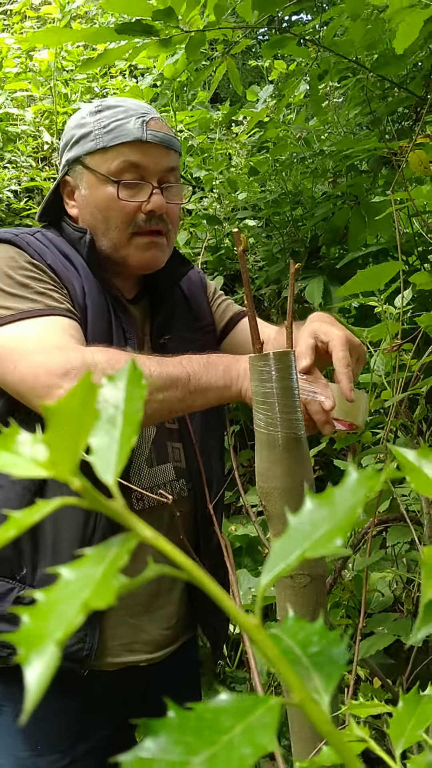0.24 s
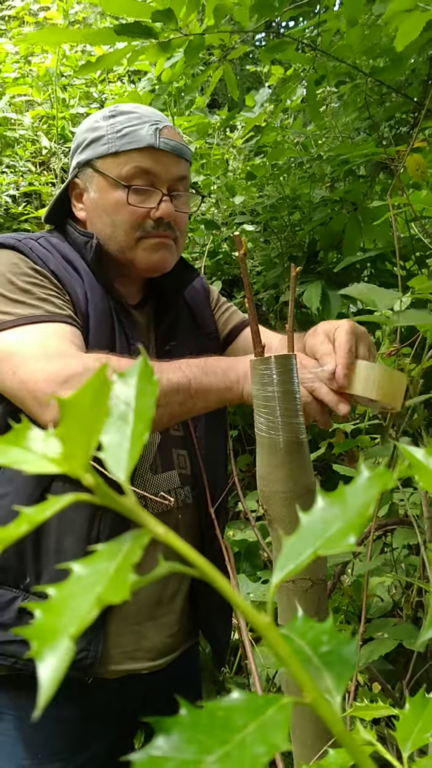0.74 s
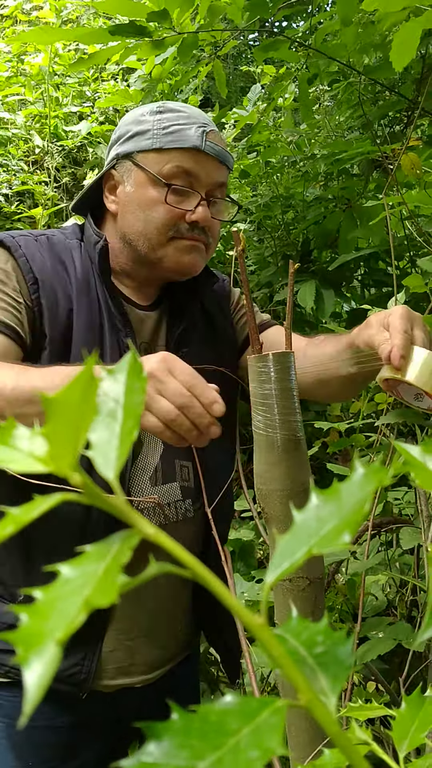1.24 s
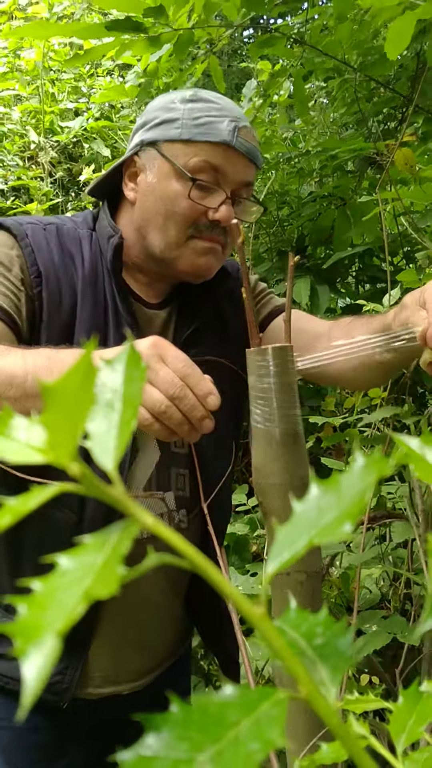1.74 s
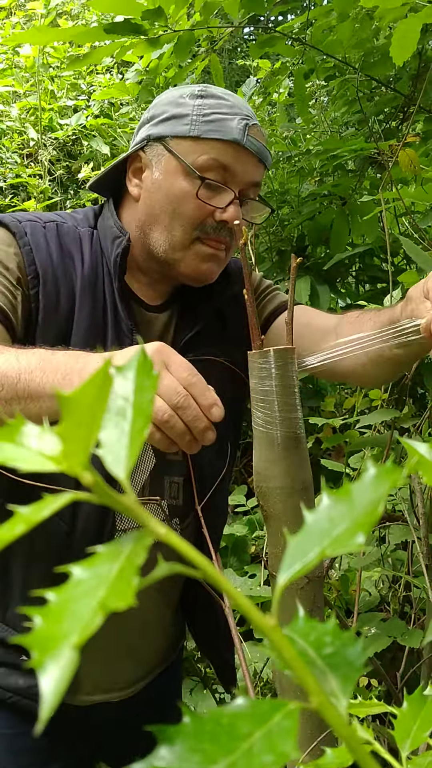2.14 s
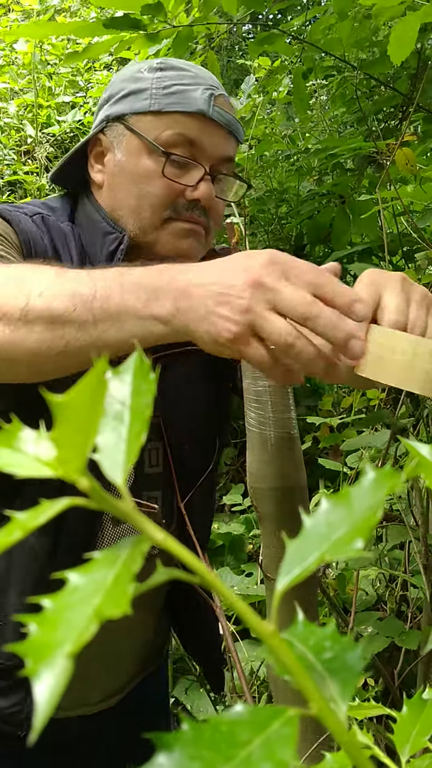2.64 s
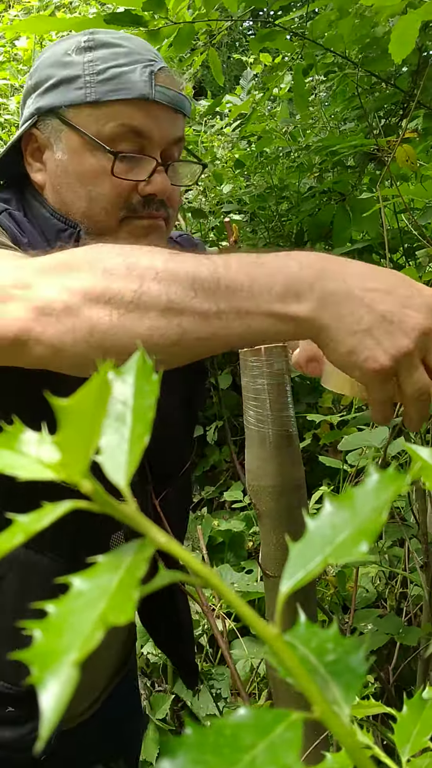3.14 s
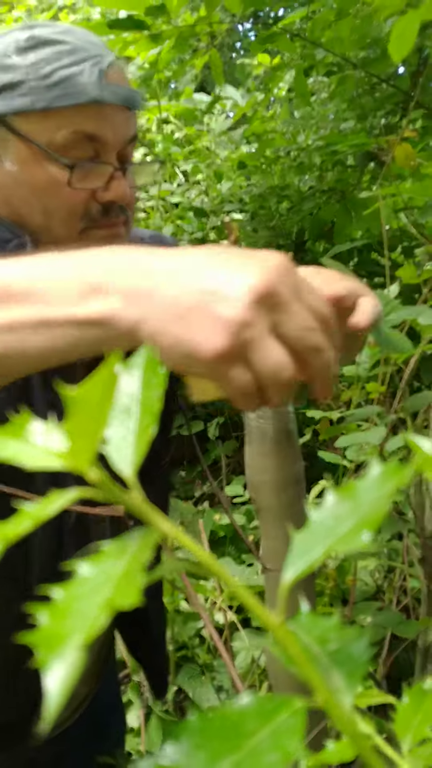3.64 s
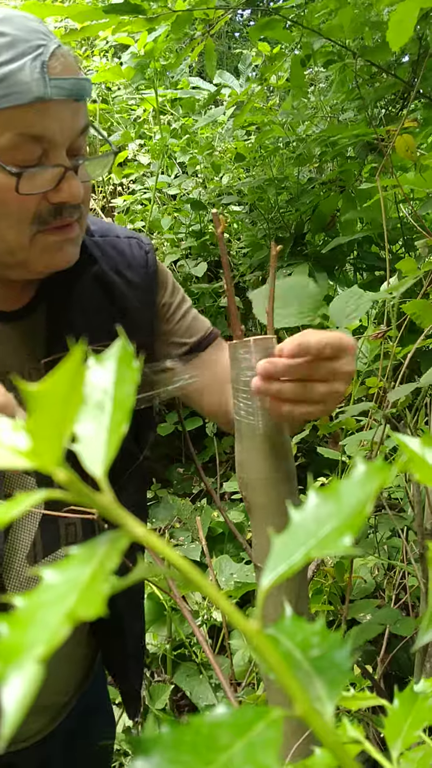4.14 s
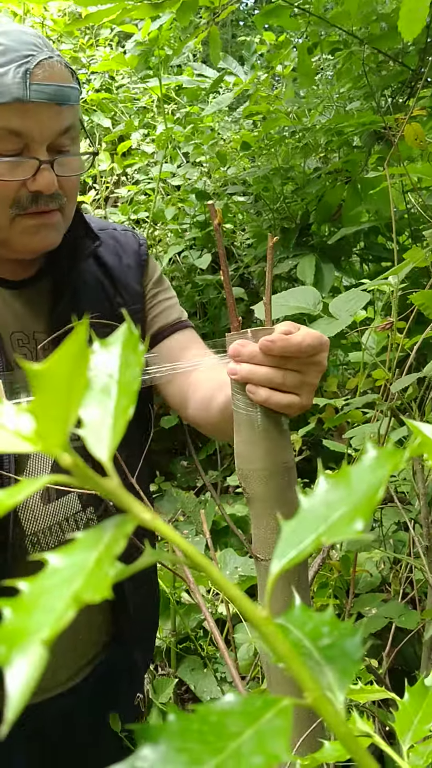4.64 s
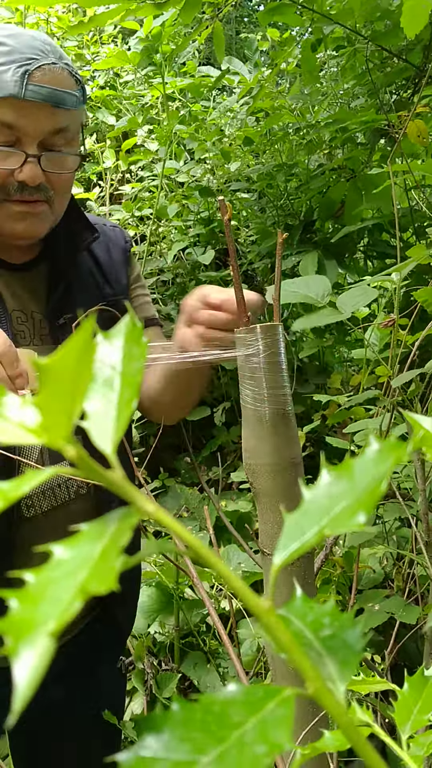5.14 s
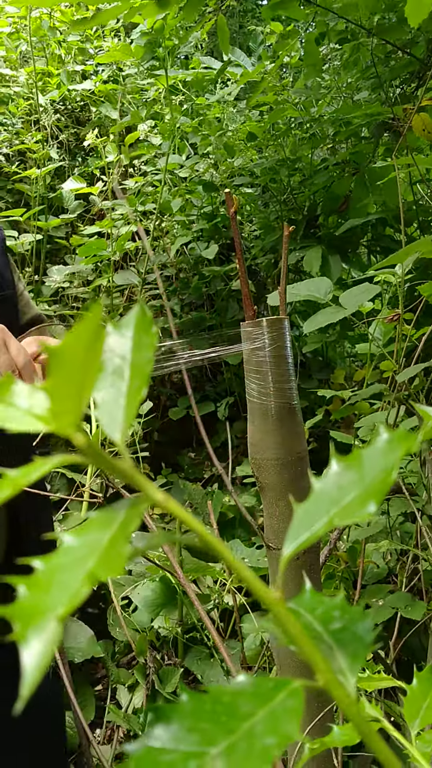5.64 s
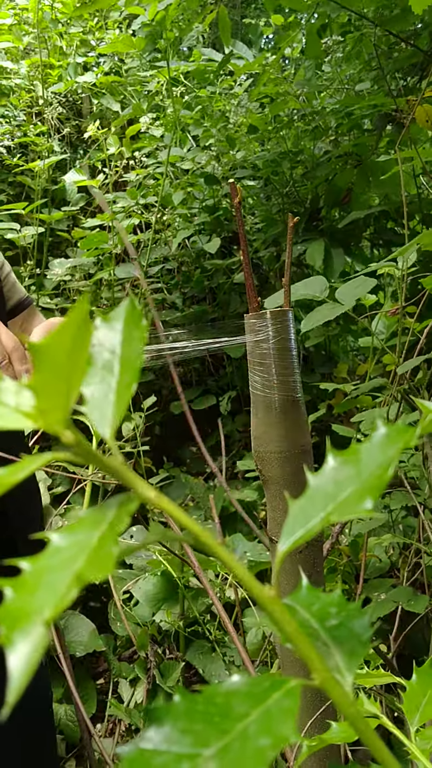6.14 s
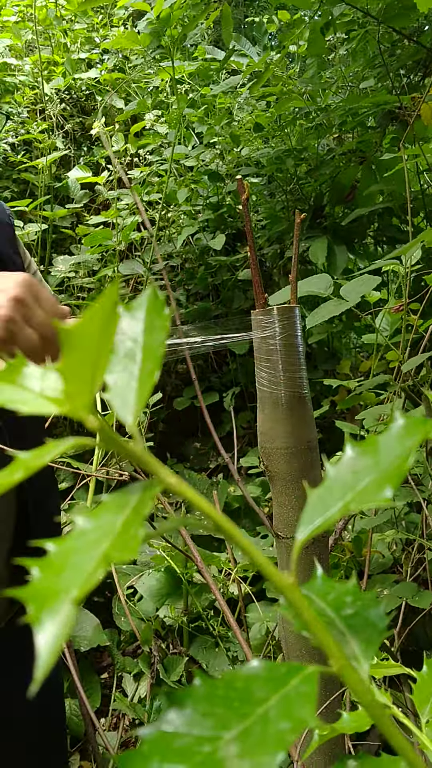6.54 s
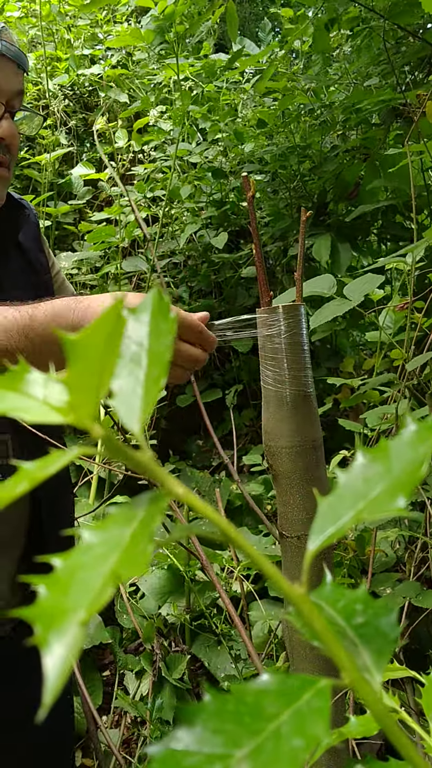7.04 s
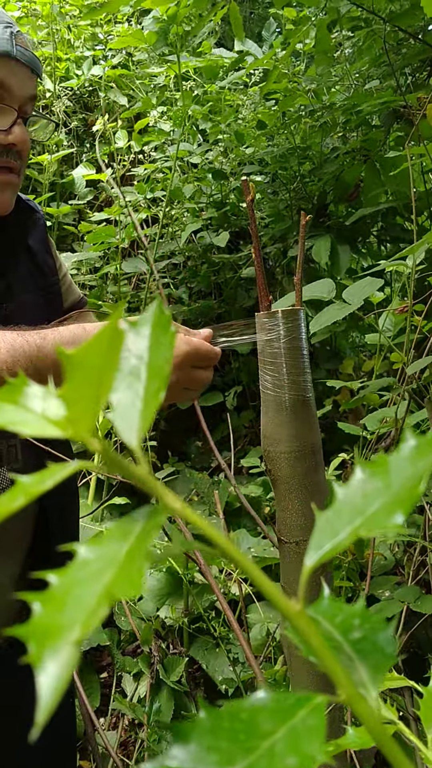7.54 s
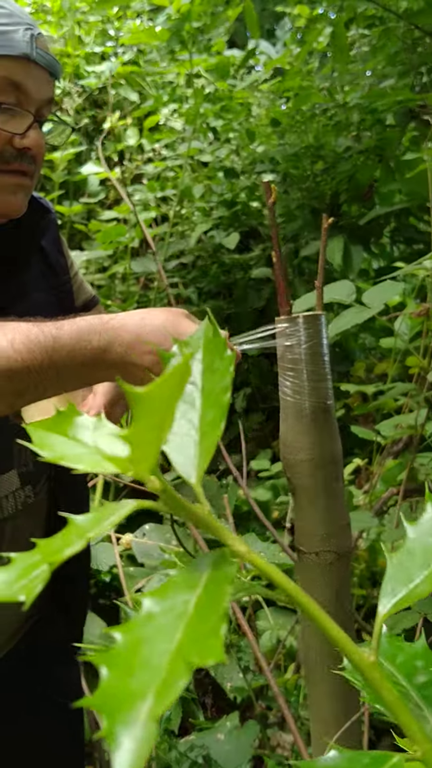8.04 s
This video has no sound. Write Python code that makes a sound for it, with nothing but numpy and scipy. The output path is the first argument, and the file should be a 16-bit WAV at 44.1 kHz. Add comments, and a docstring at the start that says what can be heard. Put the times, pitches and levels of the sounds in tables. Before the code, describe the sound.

Outdoors among leaves, film is handled very near the recorder: early crisp crackles, a near-silent stretch with faint thin whistles, then a loud stuttering tear off the roll. Quick low twangs and snaps follow as the strip tightens, then irregular hard pops with fizzing tails and sliding crinkle. The end is sparse, with a few ticks and one late double snap. Dry, close and bright.

```python
"""Sharp snaps, each trailing a bright sizzle: close to the microphone, clear plastic film is peeled off
its roll and wound tightly round a graft on a sapling, in a quiet thicket. Snaps are clicks and crumpling
noise, tearing and rubbing are grains of noise, and the taut strip twangs in decaying partials.
The leaves scatter a little back over a faint outdoor murmur; the recorder holds down the top treble."""
import sys
import numpy as np
from scipy import signal
from scipy.fft import rfft, irfft, next_fast_len
from scipy.io import wavfile
from scipy.ndimage import uniform_filter1d, map_coordinates

SR = 44100
rng = np.random.default_rng(int(sys.argv[2]) if len(sys.argv) > 2 else 0)


def dump_mix(stems):
    """Bounce the given channels to the path in sys.argv[1] as a 16-bit WAV at rate SR."""
    frames = np.atleast_2d(stems).T  # one column per channel
    limited = np.clip(frames, -1, 1)  # hard clip at full scale
    pcm = np.round(limited * 32767).astype(np.int16)
    wavfile.write(sys.argv[1], SR, pcm)


N = 364707  # samples, about 8.27 s

# Plucks of the taut film. Each row: start in seconds, crack level in dB.
PLUCK_EVENTS = [(3.936, -3.5), (4.033, -12), (4.070, -19), (4.126, -13.5), (4.154, -18.5), (4.184, -15),
                (4.282, -22), (4.346, -21), (4.359, -14.5), (4.366, -19.5), (4.438, -16.5), (4.491, -29),
                (4.578, -13.5), (4.630, -12), (4.685, -11), (4.758, -17), (4.825, -23)]
# Strokes of film sliding over itself and through the fingers.
# Each row: start in seconds, end in seconds, typical level in dB.
RUB_STROKES = [(0, 0.16, -51.5), (1.125, 1.396, -57), (3.373, 3.49, -44), (3.84, 3.954, -53),
               (4.635, 6.13, -52.5), (5.163, 5.293, -37.5), (5.487, 5.66, -46), (6.345, 6.416, -60.5),
               (7.046, 7.085, -63.5), (7.66, 7.805, -74)]


def creases(middle_hz=1850, crack_follows=0.22):
    """A crease's size sets how much it thuds or rings, its strength how clean and bright it cracks."""
    # Creases snapping over. Each row: start in seconds, crack level in dB, crease pitch in Hz,
    # sizzle level in dB.
    crease_rows = [(.016, -17, 2260, -30.5), (0.035, -25, 2200, -29.5), (.061, -25, 2200, -53),
                   (.093, -30, 2320, -41), (.118, -10.5, 2530, -26), (0.138, -11.5, 2370, -31),
                   (.474, -35, 1820, -40), (.486, -32, 2360, -30), (.497, -30, 2660, -27),
                   (.514, -20.5, 1810, -37), (.541, -16.5, 1900, -35.5), (0.616, -26, 1910, -29),
                   (.632, -11, 1820, -26.5), (0.647, -12, 1970, -40), (.660, -10.5, 2140, -37),
                   (.763, -17.5, 1900, -33), (.835, -18.5, 2670, -50), (1.025, -48, 1500, -49),
                   (1.171, -25, 3060, -35), (1.259, -30, 1860, -39.5), (1.3317, -4.5, 1800, -32.5),
                   (1.345, -40, 1980, -32.5), (1.375, -35, 5000, -40), (1.396, -27, 3470, -50),
                   (1.463, -32, 3780, -46), (1.498, -30, 3730, -44), (1.697, -32, 3570, -43.5),
                   (2.766, -33, 1176, -74), (2.921, -17.5, 1870, -43), (3.035, -35.5, 1620, -52),
                   (3.321, -23.5, 2000, -38), (3.338, -16.5, 1990, -30.5), (3.36, -22, 2580, -23),
                   (4.759, -5.5, 2810, -23), (4.78, -14.5, 2880, -20.5), (4.812, -5, 2670, -29),
                   (4.833, -13.5, 2030, -41), (4.855, -21, 1810, -36.5), (4.895, -21, 2500, -42),
                   (4.942, -30.5, 3680, -27), (5.125, -20.5, 1970, -41), (5.329, -3, 2870, -30),
                   (5.497, -19.5, 1840, -39.5), (5.552, -4.5, 2200, -28.5), (5.568, -0.5, 1990, -19),
                   (5.665, -1, 2180, -22.5), (5.812, -19, 2660, -54), (5.967, -4, 1860, -26.5),
                   (5.987, -9.5, 2040, -38), (6.008, -13.5, 2500, -38), (6.028, -20, 2130, -52),
                   (6.062, -29, 3080, -43), (6.069, -24, 3160, -57), (6.087, -31, 3300, -64),
                   (6.12, -8, 3320, -30), (6.158, -15, 1880, -63), (6.1816, -11.5, 1960, -29),
                   (6.392, -36, 1800, -43.5), (6.425, -10.5, 1760, -27.5), (6.444, -15, 1900, -42),
                   (6.486, -26, 2060, -44.5), (6.661, -4.5, 1570, -25), (7.763, -7, 1765, -30.5),
                   (7.769, -12, 1870, -32), (8.063, -38, 1550, -47.5)]
    start_s, crack_db, pitch_hz, sizzle_db = np.transpose(crease_rows)
    octaves = np.log2(pitch_hz / middle_hz)
    # larger creases sound lower and thud, smaller ones ring
    thud_db = -7.5 - 34 * octaves
    ring_db = crack_db - 26 + 21.5 * octaves
    # weak snaps have slightly less bright edge, and crumple more
    edge_db = -2.5 + 0.03 * crack_db
    clean_share = 0.83 + 0.08 * crack_db
    # the crack's spectrum slides part of the way with the pitch
    ratio = 2 ** (crack_follows * octaves)
    rows = zip(start_s, crack_db, thud_db, edge_db, sizzle_db, clean_share, ratio)
    ringing = zip(start_s, pitch_hz, ring_db)
    film = snaps(rows, crumple_t60=0.015, sizzle_t60=0.097)
    return film + rings(ringing, t60=0.021, attack_s=0.00037, detune=0.125)


def jerks(thud_db=-10, thud_db_per_s=27, edge_db=-7.5, sizzle_db=-28, clean=0.44, core_hz=785, core_db=-20):
    """Each jerk cracks and rings the roll's core; the thud grows with time as the film draws tight."""
    # The tacky film jerks free of the roll. Each row: start in seconds, crack level in dB.
    jerk_rows = [(3.557, 1.5), (3.581, 0.5), (3.600, -2), (3.620, -3.5), (3.641, -6.5), (3.7111, 3),
                 (3.752, -12), (3.778, -7), (3.813, 4), (3.8632, -2), (3.8665, 0), (3.874, -3),
                 (3.895, -10.5), (3.931, -4.5)]
    first_s = jerk_rows[0][0]
    rows = [(s, db, thud_db + thud_db_per_s * (s - first_s), edge_db, db + sizzle_db, clean, 1)
            for s, db in jerk_rows]
    core_rows = [(s, core_hz, db + core_db) for s, db in jerk_rows]
    core = rings(core_rows, t60=0.026, attack_s=0.00051, detune=0.076)
    return highpass(snaps(rows, crumple_t60=0.026, sizzle_t60=0.16), hz=190) + core


def plucks(thud_db=-6, edge_db=-1, sizzle_db=-24, clean=0.15):
    """The stretched strip slips on the stem with a snap that sets it twanging."""
    rows = [(s, db, thud_db, edge_db, db + sizzle_db, clean, 1) for s, db in PLUCK_EVENTS]
    return highpass(snaps(rows, crumple_t60=0.023, sizzle_t60=0.09), hz=130) + twangs()


def twangs(ring_db=-25.0, t60=.14, scatter=.015, attack_s=0.0035, damping=0.27, sag=0.0084,
           flutter=0.014, fizz_db=-21, fizz_t60=0.075):
    """The taut strip rings in stretched partials and fizzes; its pitch flutters and sags as tension eases."""
    # The strip's partials, as multiples of its pitch.
    multiples = [.95, 1.95, 3.02, 4.08, 5.25]
    # The pitch climbs as the strip is stretched. Each row: time in seconds, pitch in Hz before scatter.
    pitch_climb = [(3.937, 181.6), (4.04, 191), (4.36, 201.3), (4.62, 224.4), (4.8, 223)]
    # How well the strip radiates. Each row: frequency in Hz, gain in dB.
    radiation = [(170, -6), (215, -1.5), (400, -5.5), (480, -23), (600, 1.5), (680, 4.5), (800, 3),
                 (920, -43), (1050, -5), (1180, 2), (1500, 1)]
    # Spectrum of the shivering strip. Each row: frequency in Hz, relative level in dB.
    fizz_spectrum = [(3000, -35), (8000, -16), (11000, -9), (14000, 2), (15800, -12)]
    tones, shiver = np.zeros((2, N))
    t = np.arange(SR // 3) / SR
    rise = 1 - np.exp(-t / attack_s)
    for s, db in PLUCK_EVENTS:
        hz = np.interp(s, *np.transpose(pitch_climb)) * (1 + scatter * rng.standard_normal())
        shake = np.interp(t, np.arange(60) / 150, rng.standard_normal(60))  # 150 random knots a second
        bend = 1 + sag * amp(-60 * t / t60) + flutter * shake
        turns = hz * np.cumsum(bend) / SR
        for multiple in multiples:
            ring = np.sin(2 * np.pi * (multiple * turns + rng.random()))
            strength_db = db + ring_db + along(radiation, multiple * hz) + rng.normal(0, 1)
            # higher partials die sooner
            decay_db = 60 * t / t60 * (1 + damping * (multiple - 1))
            add(tones, s, amp(strength_db - decay_db) * ring * rise)
        add(shiver, s, amp(db + fizz_db - 60 * t / fizz_t60) * rise)
    return tones + shiver * noise(fizz_spectrum)


def snaps(rows, crumple_t60, sizzle_t60, smear_s=0.0006, sizzle_hold_s=0.0046, sizzle_rise_s=0.00013,
          after_per_s=270, after_db=-20.5, after_t60=0.16):
    """Film pops in one click plus a brief crumple, then sizzles on while smaller wrinkles give way.

    Each row: start in seconds, crack level in dB, thud and edge in dB relative to the crack,
    sizzle level in dB, share of energy in one clean click, pitch ratio of the crack."""
    # Spectra of a snap's low thud, its crack, its bright edge and its sizzle.
    # Each row: frequency in Hz, relative level in dB.
    thud_spectrum = [(50, -48), (95, -4), (280, -5), (500, -6), (740, 1.5), (1000, -4.5), (1600, -1),
                     (4000, -31)]
    crack_spectrum = [(300, -30), (800, -43), (1250, 3.5), (1650, -1), (2100, 6.5), (3100, 3.5),
                      (3900, -5.5), (5000, -41), (8000, -54), (16000, -39)]
    edge_spectrum = [(2000, -17), (3800, -12.5), (4800, 5), (6000, 5), (7300, 2.5), (8200, -7),
                     (11000, -10.5), (15500, -4.5)]
    sizzle_spectrum = [(100, -13), (300, -12.5), (700, -20.5), (1200, -17), (2500, -11), (4000, -11),
                       (5000, -7), (6300, -8.5), (7400, 3.5), (8600, -2), (11000, -5.5), (13000, -2),
                       (15300, 8.5), (16000, -1.5)]
    pops, shiver = np.zeros((2, N))
    t = np.arange(SR // 5) / SR
    thud, edge = colour(thud_spectrum), colour(edge_spectrum)
    fade = amp(-60 * np.maximum(t - sizzle_hold_s, 0) / sizzle_t60)
    fade *= 1 - np.exp(-t / sizzle_rise_s)
    for s, db, thud_db, edge_db, sizzle_db, clean, ratio in rows:
        crack = colour(np.array(crack_spectrum) * [ratio, 1])
        clean = np.clip(clean, .02, .97)
        pop = np.sqrt(1 - clean) * burst(t, crumple_t60)
        pop[0] += np.sqrt(clean)
        wrinkles = (rng.random(len(t)) < after_per_s / SR) * rng.standard_normal(len(t))
        pop += wrinkles * amp(after_db - 60 * t / after_t60)
        tone = np.sqrt(crack ** 2 + (amp(thud_db) * thud) ** 2 + (amp(edge_db) * edge) ** 2)
        add(pops, s, amp(db) * signal.fftconvolve(pop, causal(tone)))
        add(shiver, s, (amp(sizzle_db) * fade) ** 2)  # sizzles overlap in power
    # the treble of a pop trails its bass slightly, by smear_s at 7 kHz
    pops = filtered(pops, lambda hz: np.exp(-1j * np.pi * smear_s * hz ** 2 / 7000))
    return pops + np.sqrt(shiver) * struck(grains(rate=9000, spread_db=0), sizzle_spectrum)


def rings(rows, t60, attack_s, detune):
    """Each row (start in seconds, Hz, dB) rings as a cluster of close, quickly damped modes."""
    out, t = np.zeros(N), np.arange(SR // 5) / SR
    for s, hz, db in rows:
        modes = hz * (1 + detune * (np.linspace(-1, 1, 3) + rng.normal(0, .3, 3)))
        phases = rng.random((len(modes), 1))
        ring = np.sin(2 * np.pi * (modes[:, None] * t + phases)).mean(axis=0)
        add(out, s, amp(db - 60 * t / t60) * ring * (1 - np.exp(-t / attack_s)))
    return out


def peel(slip_rate=400, slip_db=2.0, rips_per_s=170, rip_db=-9, core_db=14):
    """Film leaves the roll in uneven slips: flurries of tiny tears and coarser rips that ring its core."""
    # Film tearing off the roll. Each row: time in seconds, relative level in dB.
    tear_levels = [(3.34, -49.5), (3.41, -27.5), (3.485, -28.5), (3.52, -24), (3.545, -39), (3.64, -36.5),
                   (3.68, -54), (3.72, -47.5), (3.9, -49), (3.96, -78)]
    # Spectrum of the tearing. Each row: frequency in Hz, relative level in dB.
    tear_spectrum = [(59, -52), (100, -42), (265, -26), (702, -10.5), (886, -24), (1860, -5), (3990, -8),
                     (7530, -3.5), (9910, -9), (15800, -3.5)]
    # Resonances of the roll's hollow core. Each row: frequency in Hz, width in Hz, relative gain in dB.
    core_modes = [(257, 30, -23.5), (747, 60, -6.5), (1380, 410, -11.5), (2060, 250, -8),
                  (3030, 280, -18.5)]
    slips = amp(0.93 * wobble(80) + slip_db * np.tanh(wobble(slip_rate)))
    texture = grains(rate=4500, spread_db=5) + amp(rip_db) * grains(rate=rips_per_s, spread_db=0)
    tears = curve(tear_levels) * slips * texture

    def core(f):
        """Summed response of the core's resonances."""
        return sum(amp(db) * 1j * f * w / (c * c - f * f + 1j * f * w) for c, w, db in core_modes)

    return struck(tears, tear_spectrum) + amp(core_db) * filtered(tears, core)


def rub():
    """Sliding film hisses, with fine crinkles on top; each stroke swells, holds and fades."""
    # Spectrum of the sliding film. Each row: frequency in Hz, relative level in dB.
    slide_spectrum = [(47, -40), (80, -31), (130, -6), (329, -9.5), (513, -16.5), (932, -10.5),
                      (1480, -12.5), (1730, -9.5), (3080, -13.5), (3590, -17.5), (5230, -21.5),
                      (7450, -7.5), (10600, -17), (15800, -6.5)]
    rise_db_per_s, fall_db_per_s = 203, 175
    t = np.arange(N) / SR
    levels = [db - rise_db_per_s * np.maximum(start - t, 0) - fall_db_per_s * np.maximum(t - end, 0)
              for start, end, db in RUB_STROKES]
    level_db = np.max(levels, axis=0)  # the loudest stroke wins
    slips = grains(rate=9000, spread_db=4) + amp(-7.0) * grains(rate=130, spread_db=8)
    return struck(amp(level_db + 3.8 * wobble(45)) * slips, slide_spectrum)


def ticks(t60=0.0027, stray_per_s=14, stray_db=-35.5, stray_spread_db=2):
    """Small wrinkles flip over without setting the sheet going; stray ones fall within the strokes."""
    # The clearest dry ticks of slack film. Each row: start in seconds, level in dB.
    clear_ticks = [(.372, -25), (0.375, -27), (.423, -28.5), (0.601, -26), (0.866, -24), (1.321, -27),
                   (2.384, -26.5), (5.426, -21), (5.911, -27), (6.118, -22), (6.326, -18), (6.337, -25),
                   (6.348, -36), (6.357, -32), (6.367, -30), (6.379, -23), (6.630, -33), (6.879, -36),
                   (7.499, -33.5), (7.633, -37), (7.700, -55), (7.744, -31), (7.92, -37)]
    # Spectrum of a tick. Each row: frequency in Hz, relative level in dB.
    tick_spectrum = [(300, -16), (1000, -29), (2500, 5), (4200, -0.5), (7500, 9), (11000, -2.5), (15500, 6)]
    out, t = np.zeros(N), np.arange(SR // 100) / SR
    times = np.cumsum(rng.exponential(1 / stray_per_s, size=300))
    levels = stray_db + stray_spread_db * rng.standard_normal(len(times))
    stray = [(s, db) for s, db in zip(times, levels)
             if any(start < s < end for start, end, _ in RUB_STROKES)]
    for s, db in clear_ticks + stray:
        add(out, s, amp(db) * burst(t, t60))
    return struck(out, tick_spectrum)


def bumps():
    """Hands bump dully on roll and sapling, each a soft-edged, damped cluster of modes."""
    # Bumps of the hands. Each row: start in seconds, frequency in Hz, level in dB.
    bump_rows = [(.02, 270, -46), (.14, 273, -40), (.635, 288, -37), (1.333, 126, -34), (1.336, 385, -34),
                 (2.766, 784, -48), (3.712, 298, -18), (3.813, 313, -27), (3.874, 257, -12),
                 (5.185, 156, -33), (7.764, 111, -26)]
    return highpass(rings(bump_rows, t60=0.058, attack_s=0.0037, detune=0.095), hz=85)


def thicket(x):
    """Leaves and stems scatter a short, diffuse answer: noise fading at its own pace in each band."""
    # Decay of the thicket. Each row: frequency in Hz, time to fall 60 dB in seconds.
    decay_times = [(150, 0.24), (1500, 0.046), (7500, 0.22), (15000, 0.12)]
    hz, t, z = signal.stft(rng.standard_normal(SR // 3), SR, nperseg=256)
    fading = z * amp(-60 * t / along(decay_times, hz)[:, None])
    tail = signal.istft(fading, SR, nperseg=256)[1]
    delayed = np.pad(tail / np.linalg.norm(tail), (SR // 400, 0))  # starts 2.5 ms late
    return signal.oaconvolve(x, delayed)[:N]


def outdoors():
    """A low murmur, a soft hiss of leaves, a far hum and thin, fluttering whistles, all shaped noise."""
    # The distant murmur, then a low far hum. Each row: time in seconds, typical level in dB.
    murmur_levels = [(0, -62.5), (2.2, -63.5), (4.5, -61.5), (8.27, -64.5)]
    hum_levels = [(0, -100), (5.7, -69), (7.5, -66.5), (8.27, -89)]
    # Spectra of the murmur and of the hiss. Each row: frequency in Hz, relative level in dB.
    murmur_spectrum = [(25, 5), (50, -51), (80, -7.5), (130, 0.5), (250, -1), (450, -8), (1000, -16.5),
                       (3000, -13), (8000, -40)]
    hiss_spectrum = [(200, -66), (700, 6.5), (1500, 4), (2900, -1), (4000, -8.5), (6000, -4), (7500, 2),
                     (9000, -6), (11500, -11), (14000, -1.5), (15500, -3)]
    # Faint thin whistles, far off. Each row: start in seconds, end in seconds, frequency in Hz,
    # level in dB at mid-swell before the flutter.
    whistle_rows = [(.15, .45, 7500, -75), (1.4, 1.798, 7170, -69.5), (1.786, 1.977, 5730, -74),
                    (1.948, 2.25, 7900, -74), (2.11, 2.35, 4690, -72), (2.237, 3.05, 5800, -73),
                    (3.08, 3.3, 4500, -77.5)]
    out = curve(murmur_levels) * amp(0.57 * wobble(5)) * noise(murmur_spectrum)
    breeze = amp(.5 * wobble(2))
    out += amp(-66.0) * breeze * noise(hiss_spectrum)
    out += curve(hum_levels) * narrow(137.4, width_hz=2.6)
    flutter = amp(0.99 * wobble(23.1))
    t = np.arange(N) / SR
    for start, end, hz, db in whistle_rows:
        swell = np.abs(np.sin(np.pi * np.clip((t - start) / (end - start), 0, 1)))
        out += amp(db) * swell * flutter * narrow(hz, width_hz=160)
    return out


def amp(db):
    """Gain of a level in dB."""
    return 10 ** (np.asarray(db) / 20)


def unit(x):
    """x at rms 1."""
    return x / np.sqrt(np.mean(x ** 2) + 1e-20)


def along(points, hz):
    """(Hz, value) points read on a log axis."""
    f, v = np.transpose(points)
    return np.interp(np.log(hz + 1), np.log(f + 1), v)


def curve(rows):
    """Gain per sample from (seconds, dB) rows, -120 dB outside them."""
    s, db = np.transpose(rows)
    return amp(np.interp(np.arange(N) / SR, s, db, left=-120, right=-120))


def wobble(rate):
    """A smooth random curve, rate knots a second."""
    knots = rng.standard_normal(int(N * rate / SR) + 4)
    return map_coordinates(knots, [np.arange(N) * rate / SR])


def filtered(x, response):
    """x times a response of frequency."""
    m = next_fast_len(len(x) + 8192)
    return irfft(rfft(x, m) * response(np.fft.rfftfreq(m, 1 / SR)), m)[:len(x)]


def noise(spectrum):
    """Coloured noise of rms 1."""
    return unit(filtered(rng.standard_normal(N), lambda hz: amp(along(spectrum, hz))))


def narrow(hz, width_hz):
    """A fuzzy line of noise of rms 1, down to half gain at width_hz either side."""
    return unit(filtered(rng.standard_normal(N), lambda f: 1 / (1 + ((f - hz) / width_hz) ** 4)))


def grains(rate, spread_db):
    """Random tiny slips, about rate a second and up to spread_db louder or softer, rms 1."""
    sizes = np.sign(rng.standard_normal(N)) * amp(spread_db * rng.uniform(-1, 1, N))
    return unit(sizes * (rng.random(N) < rate / SR))


def burst(t, t60):
    """Decaying noise of energy 1."""
    x = rng.standard_normal(len(t)) * amp(-60 * t / t60)
    return x / np.linalg.norm(x)


def colour(spectrum, size=2048):
    """Gain over frequency of a filter of energy 1."""
    return unit(amp(along(spectrum, np.fft.rfftfreq(size, 1 / SR))))


def causal(gain):
    """The most compact impulse response with this gain over frequency (minimum phase)."""
    cepstrum = irfft(np.log(gain))
    cepstrum[1:len(gain) - 1] *= 2
    cepstrum[len(gain):] = 0
    return irfft(np.exp(rfft(cepstrum)))


def struck(x, spectrum):
    """x through a causal filter with this spectrum."""
    return signal.oaconvolve(x, causal(colour(spectrum)))[:N]


def highpass(x, hz):
    """x without its bass."""
    return signal.sosfilt(signal.butter(2, hz, "highpass", fs=SR, output="sos"), x)


def add(track, s, sound):
    """Mix a sound into the track at time s."""
    start = max(0, round(s * SR))
    track[start:start + len(sound)] += sound[:max(0, N - start)]


def scene():
    """The film close by, its echo in the leaves, and the quiet outdoors."""
    film = creases() + jerks() + plucks() + peel() + rub() + ticks() + bumps()
    return (film + amp(-13) * thicket(film) + outdoors())[None]


def record(dry, low_cut_hz=75, split_hz=8200, ceiling_db=-38, top_hz=15900):
    """The deep bass is cut, the top treble has its own limiter, and a steep cut closes the band at top_hz."""
    x = highpass(dry[0], low_cut_hz)
    treble = filtered(x, lambda hz: 1 - 1 / (1 + (hz / split_hz) ** 24))
    level = np.sqrt(np.abs(uniform_filter1d(treble ** 2, size=256)))  # rms over about 6 ms
    gain = (1 + (level / amp(ceiling_db)) ** 4) ** (-1 / 4)
    limited = x + (gain - 1) * treble
    return filtered(limited, lambda hz: 1 / (1 + (hz / top_hz) ** 200))[None]


dry = scene()
out = record(dry)
dump_mix(out)
```